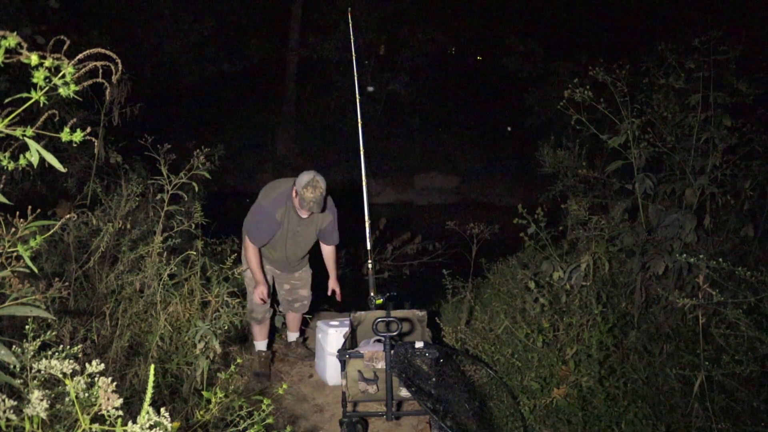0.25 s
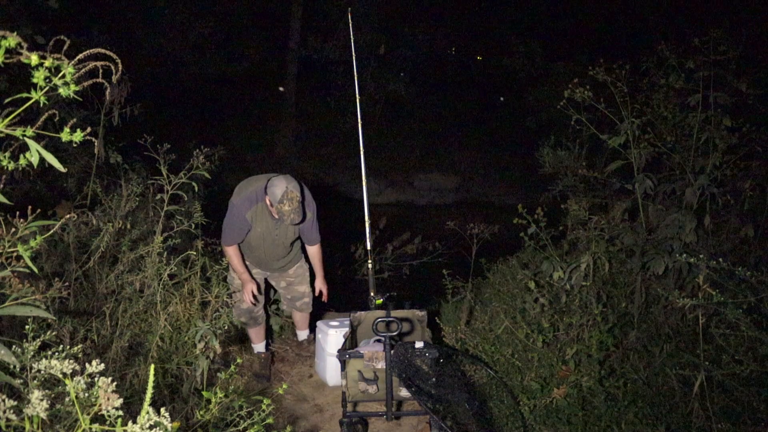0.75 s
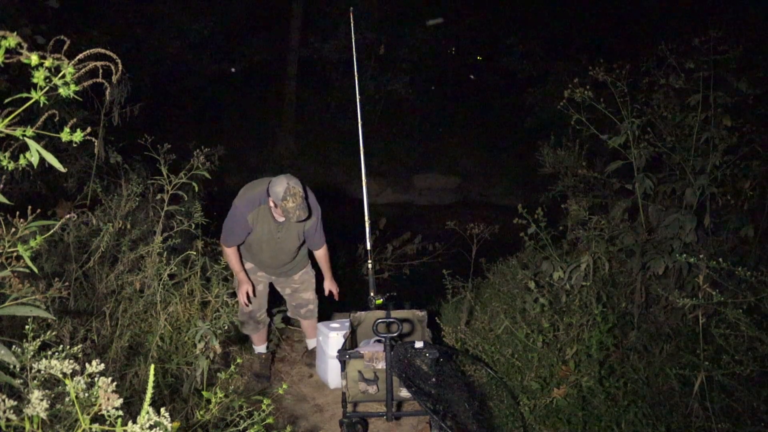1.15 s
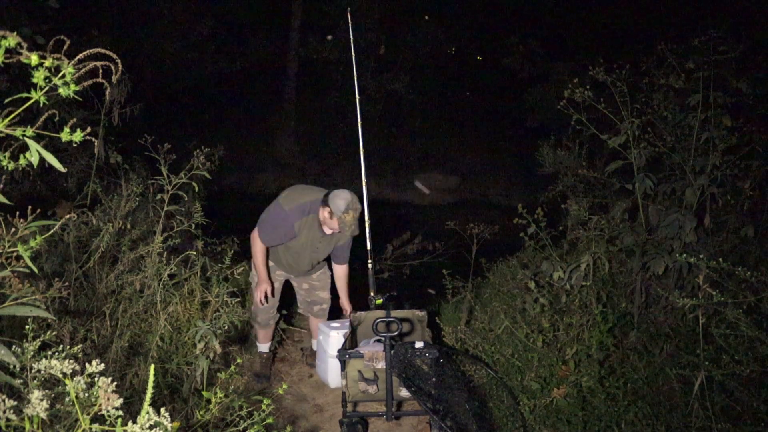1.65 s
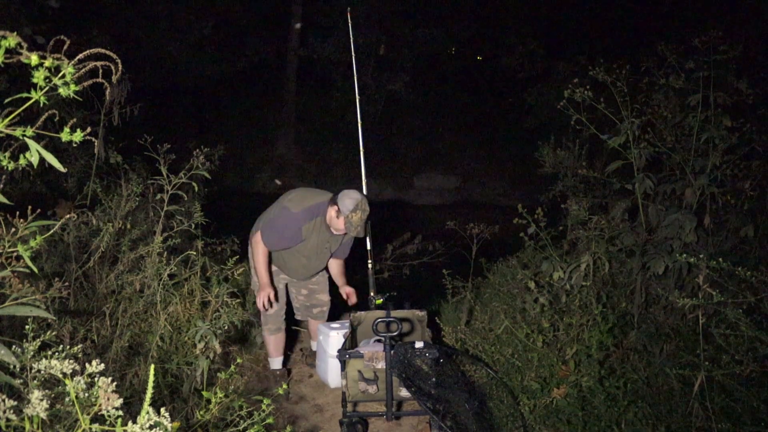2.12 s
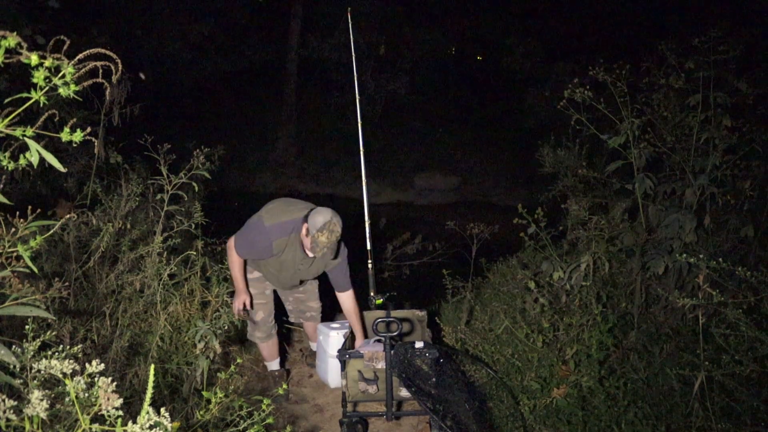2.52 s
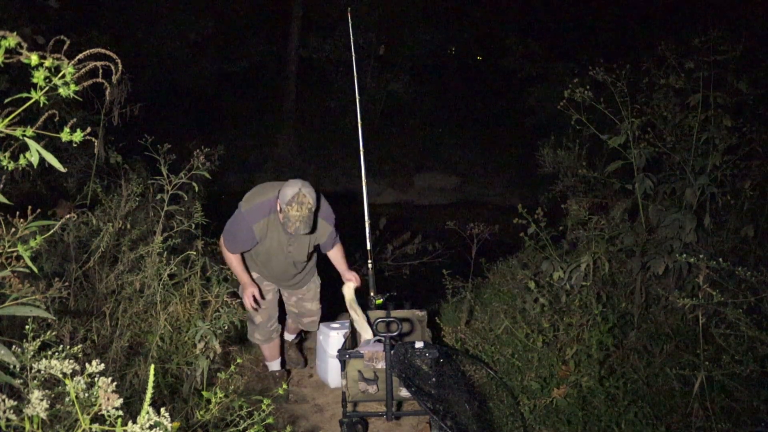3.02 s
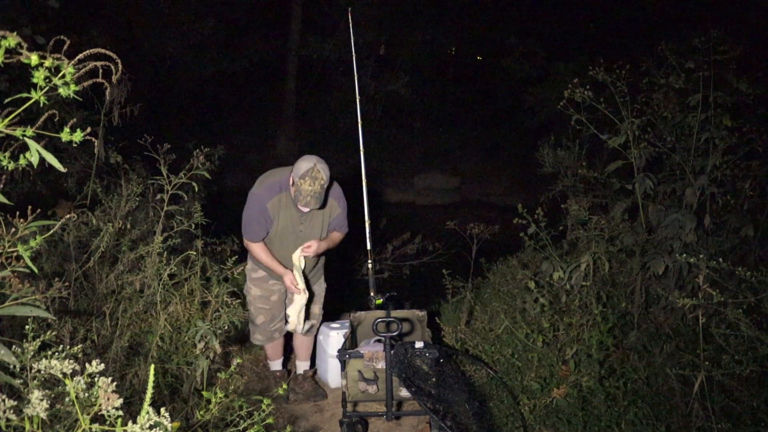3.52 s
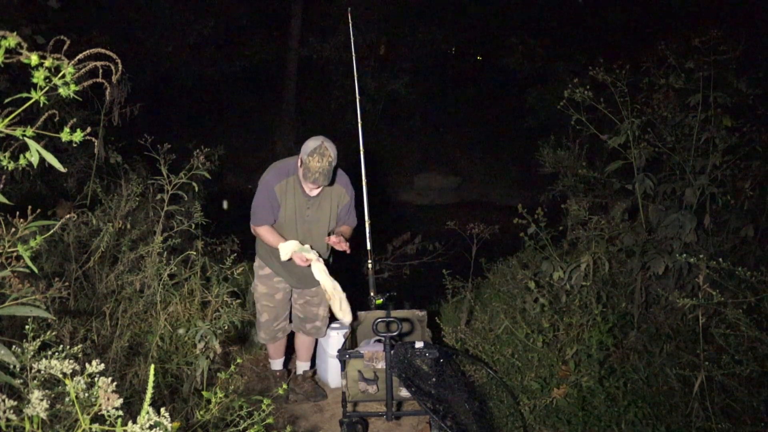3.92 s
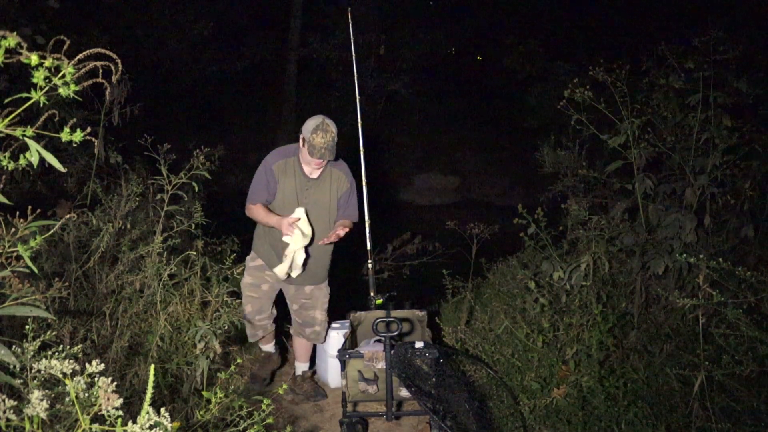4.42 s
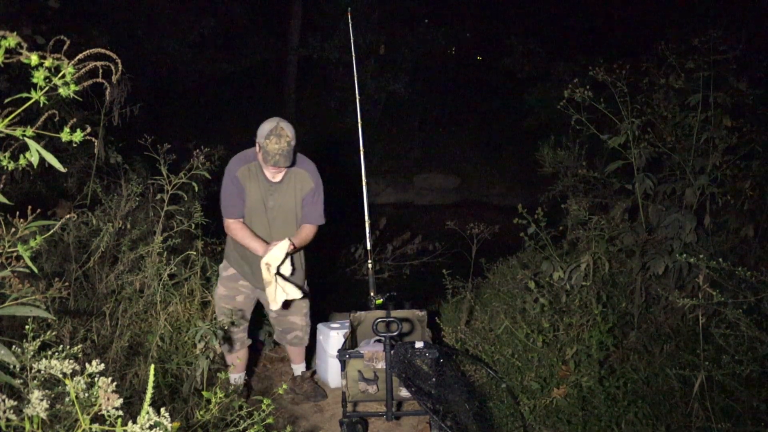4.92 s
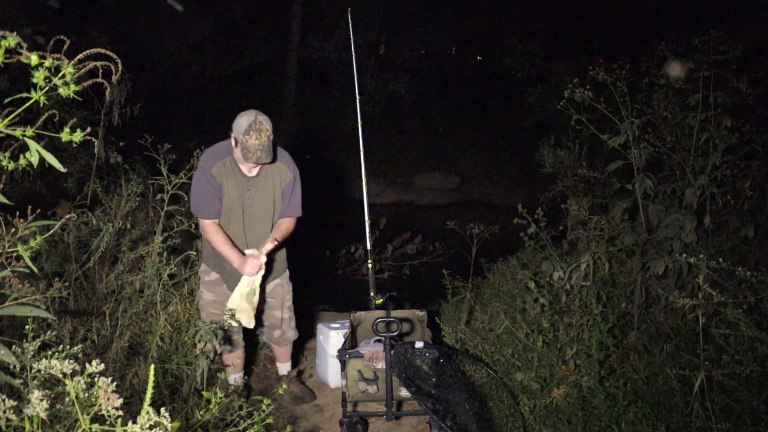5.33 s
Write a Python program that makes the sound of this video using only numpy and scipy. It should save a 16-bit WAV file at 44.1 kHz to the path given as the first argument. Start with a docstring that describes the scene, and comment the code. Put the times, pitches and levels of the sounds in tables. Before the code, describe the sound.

Crickets and katydids trill densely over a weedy creek bank at night while a plastic bucket is knocked about, then small scuffs of gear follow.

```python
"""A weedy creek bank at night, with a soft wash of water. Tree and ground crickets trill in choruses,
one close cricket pulses steadily and others chirp: each wing stroke is a short, sagging sine tone.
Katydids rasp and hiss above them, made from filtered noise that opens and closes.
A plastic bucket is knocked about a few metres away: its walls ring as fading sines, with cracks and thuds.
Short bursts of grainy noise make the scuffs and ticks of fishing gear and one knock's bright click."""
import sys
import numpy as np
from scipy import signal
from scipy.fft import rfft, irfft, next_fast_len
from scipy.io import wavfile
from scipy.ndimage import map_coordinates

SR = 44100
rng = np.random.default_rng(int(sys.argv[2]) if len(sys.argv) > 2 else 0)


def digitize_waveform(pressure):
    """Quantize a signal to 16-bit integers and store it at the path in sys.argv[1].

    Rows of a 2-D input are taken as channels; values are limited to [-1, 1].
    """
    field = np.atleast_2d(pressure).T
    bounded = np.clip(field, -1, 1)
    quanta = np.round(bounded * 32767).astype(np.int16)
    wavfile.write(sys.argv[1], SR, quanta)


N = 245175
T = np.arange(N) / SR


def undb(db):
    """Turn decibels into a plain gain."""
    return 10 ** (np.asarray(db) / 20)


def level(x, db=0):
    """Scale a sound to an average (rms) level in dB."""
    return x * undb(db) / np.sqrt(np.mean(x ** 2) + 1e-20)


def walk(rate):
    """Smooth random wandering with a spread near 1, turning about rate times a second."""
    points = rng.standard_normal(4096)
    return map_coordinates(points, [T * rate % 4000], order=2)


def colour(x, points):
    """Filter a sound by (frequency [Hz], level [dB]) points; beyond the ends it falls away steeply."""
    hz, db = np.transpose(points)
    size = next_fast_len(len(x))
    log_f = np.log(np.maximum(np.fft.rfftfreq(size, 1 / SR), 1))
    log_hz = np.log(hz)
    outside = np.abs(log_f - np.clip(log_f, log_hz[0], log_hz[-1]))
    gain = undb(np.interp(log_f, log_hz, db) - 100 * outside)
    return irfft(rfft(x, size) * gain, size)[:len(x)]


def resonance(x, hz, width):
    """Let through a band around hz, with gain 1 at its centre."""
    return signal.lfilter(*signal.iirpeak(hz, hz / width, SR), x)


def gate(t, length, rise, fall):
    """An envelope that opens at t = 0 and is shut again after length."""
    return np.clip(t / rise, 0, 1) * np.clip((length - t) / fall, 0, 1)


def weeds(x, wet_db, t60):
    """Direct sound plus its scatter from stems, leaves and the far bank, dying by 60 dB in t60 seconds."""
    t = T[:SR]
    tail = rng.standard_normal(len(t)) * undb(-60 * t / t60) * (t > .003)
    tail /= np.sqrt(np.sum(tail ** 2))
    return x + undb(wet_db) * signal.fftconvolve(x, tail)[:len(x)]


def strokes(beat, hz, duty, droop, scatter):
    """A cricket: each closing stroke rings the wing at a new pitch, which sags as the scraper slows."""
    number = np.floor(beat)
    # progress through the closing stroke, which fills the share "duty" of each beat
    progress = np.minimum((beat - number) / np.clip(duty, .1, 1), 1).astype(np.float32)
    pitch_chance, loudness_chance = rng.standard_normal((1024, 2)).T
    which = number.astype(int) & 1023
    pitch = hz * ((1 + scatter * pitch_chance)[which] - droop * (progress ** 2 - 1 / 4))
    turns = np.cumsum(pitch) / SR
    ring = np.sin(2 * np.pi * (turns - np.floor(turns)).astype(np.float32))
    return undb(0.4 * loudness_chance)[which] * np.sin(np.pi * progress) * ring


def crowd(low_hz, high_hz, beat_hz, duty, droop, scatter, count):
    """Many crickets spread over a range of pitch, each at its own wandering pace."""
    out = 0
    for hz in np.linspace(low_hz, high_hz, count):
        pace, start = rng.uniform(.75, 1.25), rng.random()
        drift = np.interp(T, np.linspace(0, T[-1], 40), rng.standard_normal(40))
        beat = start + beat_hz * pace * T + .3 * drift
        out = out + strokes(beat, hz, duty, droop, scatter)
    return out


# tone of the creek's wash: (frequency [Hz], relative level [dB])
CREEK_TONE = [(15, -48), (25, -28), (40, -5.5), (60, -1.5), (87, -3.5), (108, -0.5), (163, -9.5),
              (219, -3.5), (419, -8), (584, -6), (758, -6.5), (1000, -6), (1120, -7.5), (1270, -8.5),
              (2100, -15), (2730, -48), (4620, -120)]
# tone of the faint hiss of the far woods: (frequency [Hz], relative level [dB])
WOODS_TONE = [(1700, -26), (2200, 3.5), (4400, -2), (7000, 6), (10000, -7.5), (16000, -1)]


def night_air():
    """The creek is filtered noise of wandering level, over a faint even hiss."""
    water = level(colour(rng.standard_normal(N), CREEK_TONE), -63.0)
    water *= undb(0.47 * walk(2.574) + 0.77 * walk(12))
    hiss = level(colour(rng.standard_normal(N), WOODS_TONE), -64.0)
    return water + hiss


# filters that balance the pitches within each chorus: (frequency [Hz], relative level [dB])
TREE_TONE = [(2050, 5.5), (2300, -7.5), (2430, -9.5), (2600, -3.5), (2780, -3), (2900, 1), (2990, 3),
             (3100, -2.5), (3220, -1.5), (3400, -7)]
MIDDLE_TONE = [(3350, -1.5), (3600, -3.5), (3850, 2.5), (4050, 0.5), (4250, -10)]
GROUND_TONE = [(4700, -18), (5000, -8.5), (5300, -1), (5650, 2), (5950, 1), (6200, -7.5), (6400, -4),
               (6650, -4.5), (6900, -12.5), (7200, -12), (7500, -8.5), (7750, -19.5), (8050, -9.5),
               (8450, -35)]


def choruses():
    """Tree crickets near 3 kHz, a faint group near 4 kHz and ground crickets above, blurred by scatter."""
    trees = crowd(2400, 3150, 52, duty=.55, droop=.04, scatter=.012, count=11)
    trees = weeds(trees, wet_db=-3.5, t60=1.0)
    middle = crowd(3550, 4050, 42, duty=.5, droop=.06, scatter=0.013, count=4)
    middle = weeds(middle, wet_db=3, t60=0.99)
    ground = crowd(5000, 8200, 66, duty=.6, droop=.05, scatter=.01, count=16)
    ground = weeds(ground, wet_db=-1.5, t60=1.0)
    # the tree and ground choruses also waver in level
    return (level(colour(trees, TREE_TONE), -57.0) * undb(0.11 * walk(3.2))
            + level(colour(middle, MIDDLE_TONE), -69.5)
            + level(colour(ground, GROUND_TONE), -54.5) * undb(.5 * walk(1.88)))


# the close cricket's steady wing beat, and how far into a beat it starts (share of a cycle)
WING_BEAT_HZ, WING_START = 40.085, .43


def close_cricket():
    """One unbroken trill from the grass nearby; its strokes vary a little in pitch and loudness."""
    song = strokes(WING_START + WING_BEAT_HZ * T, 6665, duty=.54, droop=.04, scatter=0.00238)
    return level(weeds(song, wet_db=-20, t60=0.17), -59)


# a rasp opens quickly and dies away over these shares of its length
RASP_RISE, RASP_FALL = .045, 0.48
SCRAPE_HZ = 15.2  # rate of the throb
# rasps, levels before scatter: (start [s], length [s], level [dB], throb depth [0-1])
BUSH_RASPS = [(-.15, 2.2, -73, 0.3), (1.842, 0.62, -72, .5), (2.793, 0.19, -61.5, .45),
              (2.893, 0.63, -54.5, 0), (4.12, 0.39, -60.5, 0.4), (4.635, 0.27, -60, .35),
              (4.705, 0.47, -56, 0.04), (5.487, .38, -59.5, .35)]


def bush_katydids():
    """Toothy rasps from a bush: grainy noise that swells and fades, throbbing with each scrape."""
    power = 0
    for start, length, db, depth in BUSH_RASPS:
        shape = gate(T - start, length, RASP_RISE * length, RASP_FALL * length)
        throb = 1 + depth * np.cos(2 * np.pi * SCRAPE_HZ * (T - start - .015))
        power = power + (undb(db) * shape * throb) ** 2
    teeth = rng.standard_normal(N) * undb(2.0 * walk(500))
    wing = colour(teeth, [(6500, -31), (7500, -9.0), (8400, -4), (9200, -7.5),
                          (10200, -13), (11500, -17.5), (13000, -27), (15500, -25)])
    rasp = level(wing * undb(0.93 * walk(90)), -2.2) * np.sqrt(power)
    return weeds(rasp, wet_db=-6.0, t60=0.22)


# every buzz swells slowly and stops sooner, over the steady hiss of those farther off
MEADOW_SWELL_S, MEADOW_STOP_S, MEADOW_BED_DB = 0.22, 0.085, -70
# tone of the hiss: (frequency [Hz], relative level [dB])
MEADOW_TONE = [(8000, -16), (10000, -1), (11500, 4.5), (13500, 9), (15000, 2.5), (16500, 15)]
# overlapping distant buzzes: (start [s], length [s], level [dB])
BUZZ_TIMES = [(-.08, 0.5, -64.5), (.44, 1.27, -64), (.64, .52, -65.5), (1.72, 0.89, -64), (1.88, 0.45, -67),
              (2.58, 2.48, -65), (3.4, .65, -71), (4.56, 0.46, -62.5), (5.16, .64, -62)]


def meadow_katydids():
    """A far high hiss of filtered noise, in waves as the power of overlapping buzzes adds up."""
    power = undb(MEADOW_BED_DB) ** 2
    for start, length, db in BUZZ_TIMES:
        power = power + (undb(db) * gate(T - start, length, MEADOW_SWELL_S, MEADOW_STOP_S)) ** 2
    hiss = colour(rng.standard_normal(N), MEADOW_TONE) * undb(0.73 * walk(180))
    return level(hiss) * np.sqrt(power)


def phrase(start, length, hz, db, beat_hz, duty, droop, scatter, rise, fall):
    """A short run of wing strokes, placed at its start time."""
    t = T[:int(length * SR)]
    song = level(strokes(t * beat_hz, hz, duty, droop, scatter), db) * gate(t, length, rise, fall)
    # a spare second in front lets a phrase begin before time zero
    return np.pad(song, (SR + round(start * SR), N))[SR:SR + N]


def chirp(start, length, hz, db, swell):
    """A brief, nearly pure trill that swells and fades; its wing-beat rate varies by chance."""
    return phrase(start, length, hz, db, beat_hz=rng.normal(52.6, 2.96), duty=0.9, droop=0.0197,
                  scatter=0.00791, rise=swell, fall=0.074)


# all levels here are before the swell, the scatter and the final mix in chirpers()
# a farther cricket chirps like clockwork
FAR_HZ, FAR_DB, FAR_LENGTH_S = 5390, -59, 0.29
FAR_FIRST_S, FAR_EVERY_S = .92, 1.475
# the lowest cricket, whose chirps have a soft buzzing underside
LOW_HZ, LOW_DB, LOW_LENGTH_S, BUZZ_HZ, BUZZ_DB = 4890, -60, 0.31, 4620, -68
# when the lowest cricket chirps: start [s]
LOW_CHIRP_TIMES = [-.07, 1.232, 2.82, 4.25]
# each cricket's own voice: (pitch [Hz], level [dB], swell [s], chirp length [s])
VOICES = [(5332, -49.5, .012, .36), (5500, -51, 0.013, 0.27), (5224, -53, 0.03, 0.29),
          (5025, -58, .03, .29), (5530, -55.5, 0.037, .3)]
# one list for each voice, in the same order: chirp starts [s]
VOICE_TIMES = [
    [1.292, 3.28, 4.888],
    [.66, 1.28, 2.765, 4.235, 4.87],
    [.206, 2.094, 3.735, 4.96],
    [2.09, 3.235, 4.157],
    [1.15, 3.74],
]
# short bursts of falling pips: (start [s], length [s], level [dB])
PIP_BURSTS = [(0.579, 0.073, -61.5), (0.889, 0.14, -62), (1.245, .105, -61)]


def chirpers():
    """Crickets across the bank sing short runs of wing strokes, each repeating its own chirp."""
    chirps, buzzes, pips = np.zeros(N), np.zeros(N), np.zeros(N)
    for (hz, db, swell, length), starts in zip(VOICES, VOICE_TIMES):
        for start in starts:
            chirps += chirp(start, length, hz, db, swell)
    for start in np.arange(FAR_FIRST_S, T[-1], FAR_EVERY_S):
        chirps += chirp(start, FAR_LENGTH_S, FAR_HZ, FAR_DB, swell=0.045)
    for start in LOW_CHIRP_TIMES:
        chirps += chirp(start, LOW_LENGTH_S, LOW_HZ, LOW_DB, swell=0.044)
        buzzes += phrase(start, LOW_LENGTH_S, BUZZ_HZ, BUZZ_DB, beat_hz=48.2, duty=.7, droop=.06,
                         scatter=0.0124, rise=0.0098, fall=0.075)
    for start, length, db in PIP_BURSTS:
        pips += phrase(start, length, 3940, db, beat_hz=45.6, duty=0.6, droop=0.114,
                       scatter=0.0072, rise=0.0087, fall=.004)
    return (undb(-4.5) * weeds(chirps, wet_db=-4.5, t60=0.48)
            + undb(-7.5) * weeds(buzzes, wet_db=6.0, t60=.2)
            + undb(-2) * weeds(pips, wet_db=-12, t60=.15))


# a crack is brighter the louder it is: its top at a given level, and the dB that double it
CRACK_TOP_HZ, CRACK_AT_DB, CRACK_DOUBLING_DB = 2600, -33, 16.5
# ways the bucket rings: (frequency [Hz], relative level [dB], time to fade by 60 dB [s])
BUCKET_MODES = [(77.4, -20, 0.09), (106.2, -11.5, 0.28), (145.8, 1.5, 0.16), (168.7, -11.5, 0.22),
                (209, -11.5, 0.24), (254.8, -3, 0.23), (306.7, -0.5, 0.14), (347, -18.5, 0.18),
                (432, -17, 0.27), (454, 10, 0.061), (506, -2.5, 0.15), (587, 3.5, 0.1), (728, -27, 0.25),
                (835, -3.5, 0.078), (910, -35, 0.071), (974, 9, 0.05), (1150, -17, 0.092),
                (1450, -3, 0.025), (2400, -26, 0.057)]
# blows, where a harder one drives higher modes; crack and thud levels are relative to the blow:
# (time [s], level [dB], hardness as a corner frequency [Hz], crack [dB], thud [dB], thud pitch [Hz])
BLOWS = [(0.0, -47, 352, 1, 3, 315), (.2063, -21, 278, -3, 4.5, 269.6), (.968, -38, 180, -6.5, -3.5, 117),
         (.992, -50, 180, -3, 5, 96), (1.166, -42.5, 600, 7, -12, 400), (1.172, -37.5, 480, 1, 10.5, 326),
         (1.211, -43.5, 200, -11, 2, 174), (1.303, -44.5, 430, -4.5, 8, 343), (1.458, -47, 320, -6, 2, 213),
         (1.746, -56.5, 120, -18, 7, 89), (1.848, -27, 330, -2.5, -2, 164), (1.8642, -33, 700, 0, -24, 134)]


def bucket():
    """Each blow rings the plastic walls, cracks at the contact and thuds against the soil."""
    out, t = np.zeros(N + SR), T[:SR // 2]
    for start, db, hard_hz, crack_db, thud_db, thud_hz in BLOWS:
        chance = rng.standard_normal((len(BUCKET_MODES), 2))
        ring = np.zeros(len(t))
        for (hz, mode_db, t60), (share, detune) in zip(BUCKET_MODES, chance):
            # a soft blow hardly drives the high modes; the spot struck varies their shares
            strength = undb(mode_db + 1.45 * share) / np.hypot(1, (hz / hard_hz) ** 2)
            tone = np.sin(2 * np.pi * hz * (1 + 0.013 * detune) * t)
            ring += strength * tone * undb(-60 * t / t60)
        ring *= np.minimum(t / 0.0046, 1)  # the whole wall takes a moment to swing

        # the struck part itself is heavily damped and swings only two or three times
        age = t * thud_hz
        thud = np.sin(2 * np.pi * thud_hz * t) * (age * np.exp(1 - age)) ** 2

        crack = level(colour(rng.standard_normal(len(t)), [(300, -6.5), (800, 7.5), (1500, 0.5),
                                                           (3000, -6), (6000, -4), (15000, -9.0)]))
        # a quick fade with a fainter, slower one beneath
        crack *= undb(-60 * t / 0.03) + undb(-16.5) * undb(-60 * t / 0.12)
        top_hz = CRACK_TOP_HZ * 2 ** ((db + crack_db - CRACK_AT_DB) / CRACK_DOUBLING_DB)
        crack = signal.lfilter(*signal.butter(2, min(top_hz, SR / 3), fs=SR), crack)

        # the soil under the base gives a short deep bump, weaker for a hard blow
        soil = np.sin(2 * np.pi * 76 * t) * (t / 0.012) * np.exp(1 - t / .014)
        soil /= np.hypot(1, (hard_hz / 330) ** 2)

        blow = 0.85 * ring + undb(crack_db) * crack + undb(thud_db) * thud + undb(-13.0) * soil
        i = max(round(start * SR), 0)
        out[i:i + len(t)] += undb(db) * blow
    return weeds(out[:N], wet_db=-14.0, t60=0.3)


# faint ticks: middle level and pitch (the pitch is also the filter width), and length
FIDGET_DB, FIDGET_HZ, FIDGET_S = -68, 1000, .012


def fidgets(count):
    """Faint ticks at chance moments, scattered in level and pitch."""
    return [(T[-1] * when, FIDGET_DB + 6 * (size - .5), FIDGET_HZ * 2 ** (pitch - .5), FIDGET_HZ, FIDGET_S)
            for when, size, pitch in rng.random((count, 3))]


# the clearest scuffs and ticks; the one at 1.165 s is the bright click of a bucket knock
# levels are before the swell and fade:
# (middle time [s], level [dB], centre [Hz], width of each filter pass [Hz], length [s])
SCUFFS_AND_CLICK = [(.998, -60.5, 1440, 1200, .028), (1.165, -45, 4580, 6900, 0.0033),
                    (1.281, -58, 2080, 900, 0.016), (2.183, -58, 1380, 3100, 0.052),
                    (2.826, -62.5, 760, 1200, 0.12), (2.883, -65.5, 70, 60, 0.11),
                    (3.057, -61, 985, 1510, 0.022), (3.469, -62, 696, 1500, 0.023),
                    (4.69, -58, 1580, 900, .009), (4.794, -56, 2370, 4200, .06),
                    (4.838, -53, 586, 397, 0.0066)]


def scuffs():
    """Rubs and ticks of gear, cloth and shoes, and one knock's click: filtered grainy noise in short swells."""
    grit = rng.standard_normal(N) * undb(3.5 * walk(600))
    out = np.zeros(N)
    for middle, db, hz, width, length in SCUFFS_AND_CLICK + fidgets(count=6):
        burst = resonance(resonance(grit, hz, width), hz, width)
        out += level(burst, db) * np.exp(-2 * ((T - middle) / length) ** 2)
    return out


def scene():
    """Everything reaches one microphone, alike in both channels."""
    insects = choruses() + close_cricket() + bush_katydids() + meadow_katydids() + chirpers()
    mono = night_air() + insects + bucket() + scuffs()
    return np.array([mono, mono])


TOP_HZ = 15800  # upper limit of the recorder


def record(dry):
    """The recorder thins the deepest bass and cuts the top steeply."""
    thinned = signal.sosfilt(signal.butter(2, 42, "high", fs=SR, output="sos"), dry)
    return signal.sosfilt(signal.ellip(12, .1, 70, TOP_HZ, fs=SR, output="sos"), thinned)


dry = scene()
out = record(dry)
digitize_waveform(out)
```